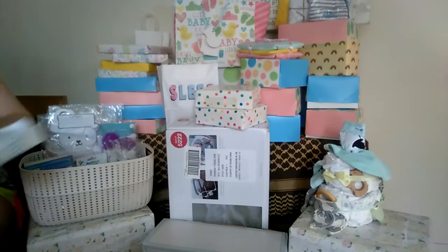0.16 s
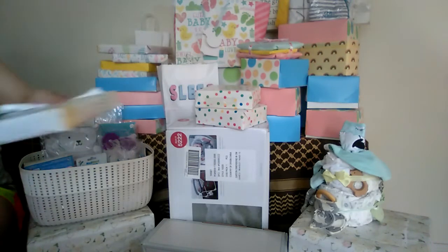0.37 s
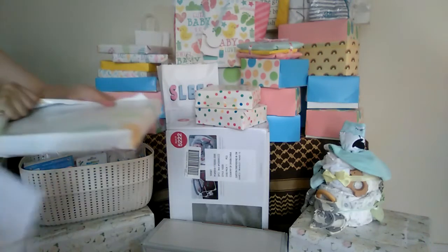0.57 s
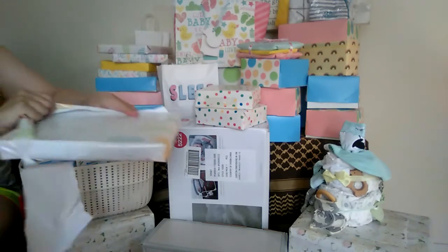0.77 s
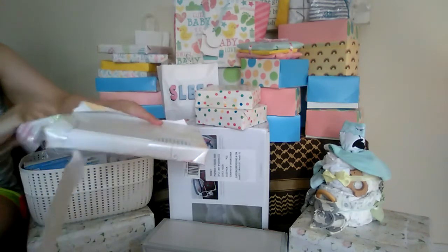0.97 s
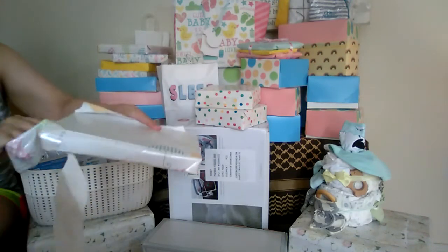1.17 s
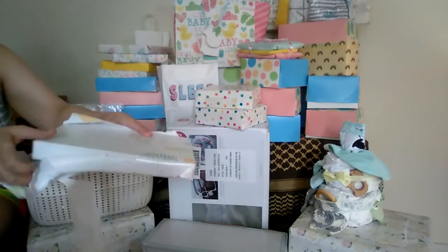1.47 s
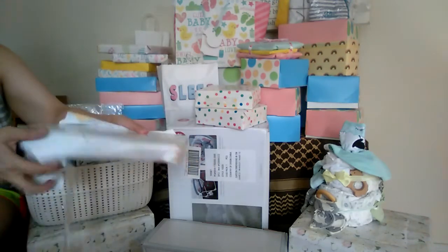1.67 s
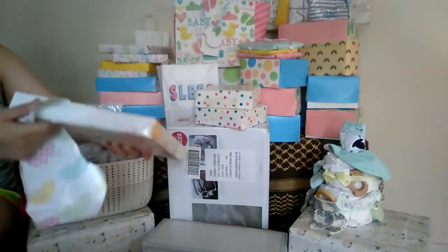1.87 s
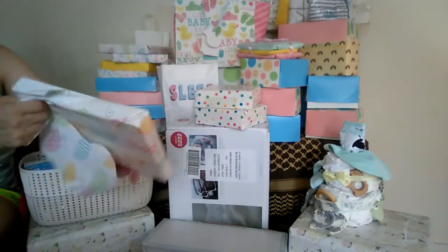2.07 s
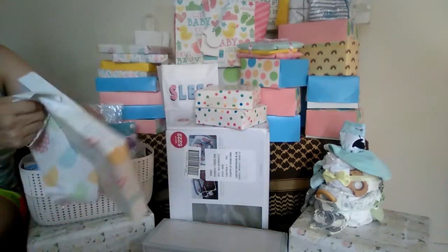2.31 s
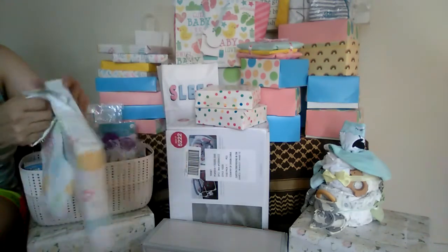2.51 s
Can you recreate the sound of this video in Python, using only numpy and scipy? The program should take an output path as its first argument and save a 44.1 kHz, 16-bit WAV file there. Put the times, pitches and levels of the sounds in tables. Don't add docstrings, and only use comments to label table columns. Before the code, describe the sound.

Glossy wrapping paper is torn and crinkled off a flat cardboard box in irregular spurts, with bright snaps, hollow lid knocks and short pauses, close to a small stereo microphone in a small room.

```python
import sys
import numpy as np
from scipy import signal
from scipy.fft import rfft, irfft
from scipy.io import wavfile
from scipy.ndimage import uniform_filter1d, minimum_filter1d

SR = 44100
rng = np.random.default_rng(int(sys.argv[2]) if len(sys.argv) > 2 else 0)


def volts_from_db(level):
    exponent = np.asarray(level, float) / 20
    return 10 ** exponent


def wav_record(signal):
    frames = np.transpose(np.atleast_2d(signal))
    bounded = np.clip(frames, -1, 1)
    quanta = np.round(bounded * 32767).astype(np.int16)
    wavfile.write(sys.argv[1], SR, quanta)


N = 116865


def evened(x):
    return x / np.sqrt(np.mean(x ** 2) + 1e-20)


def read(points, hz):
    f, value = np.transpose(points)
    return np.interp(np.log(hz + 1), np.log(f + 1), value)


def add(mix, start_s, sound):
    part = mix[..., round(start_s * SR):][..., :sound.shape[-1]]
    part += sound[..., :part.shape[-1]]


def colour(x, points, slope=1.):
    hz = abs(np.fft.fftfreq(4096, 1 / SR))
    log_gain = slope * np.log(volts_from_db(read(points, hz)))
    phase = -signal.hilbert(log_gain).imag
    taps = np.fft.ifft(np.exp(log_gain + 1j * phase)).real[:2048]
    if slope == 1:
        taps = taps / np.linalg.norm(taps)
    return signal.oaconvolve(x, taps)[:len(x)]


def resonate(x, hz, width_hz):
    turn = np.exp(2j * np.pi * np.cumsum(hz * np.ones(len(x))) / SR)
    r = np.exp(-np.pi * width_hz / SR)
    smooth = signal.lfilter([1 - r], [1, -r], x / turn)
    return 2 * (turn * smooth).real


# (pitch [Hz], level [dB per Hz])
AIR_SPECTRUM = [(15, -38.5), (25, -6.5), (249, -2), (335, -12), (503, 0.5), (2760, -11.5), (3340, -15.5),
                (11300, 1), (16000, -30)]


def air(busy):
    a, b, c = rng.standard_normal((3, N))
    hiss = np.array([colour(a, AIR_SPECTRUM), colour(0.46 * a + 0.6 * b, AIR_SPECTRUM)])
    rumble = [resonate(resonate(c + k * b, 66, 58), 66, 58) for k in (.17, -.17)]
    rumble = evened(np.array(rumble))
    busy_power = abs(uniform_filter1d(busy ** 2, size=2000))
    busy_db = np.clip(10 * np.log10(busy_power + 1e-9), -75, -52)
    return volts_from_db(-74.5) * hiss + volts_from_db(-75.5 + 0.4 * (busy_db + 50.0)) * rumble


def creases(low_hz, high_hz, cycles):
    creases_per_s, spread_db = 6000, 3.5
    size = volts_from_db(spread_db * np.minimum(rng.exponential(1, N), 5))
    size = size * (rng.random(N) < creases_per_s / SR) * rng.choice([-1., 1.], N)
    kind, out = rng.integers(0, 24, N), np.zeros(N)
    for k, hz in enumerate(np.geomspace(low_hz, high_hz, 24)):
        u = np.arange(400) / SR * hz
        grain = np.sin(2 * np.pi * u) * np.exp(-u / cycles)
        out += signal.oaconvolve(size * (kind == k), grain / np.linalg.norm(grain))[:N]
    spectrum = rfft(out)
    smooth_power = uniform_filter1d(abs(spectrum) ** 2, size=1500)
    return evened(irfft(spectrum / np.sqrt(smooth_power + 1e-9), N))


# (pitch [Hz], level [dB per Hz])
FILM_SPECTRUM = [(880, -57.5), (1500, -26.5), (3580, -20.5), (7000, -21), (10500, -7.5), (13900, -15.5),
                 (14600, -32), (16500, -34)]
# (pitch [Hz], level [dB per Hz])
BOX_SPECTRUM = [(60, -12), (200, -16), (330, -13.5), (540, -2), (1000, -5.5), (2500, -4), (5000, -6.5),
                (9000, -15.5)]
# (start [s], length [s], first level [dB], last level [dB], box share [dB])
PULLS = [(0, 0.036, -45.5, -56, -4), (0.063, 0.059, -51, -50, -0.5), (0.136, 0.013, -67, -58.5, 7.5),
         (0.164, 0.076, -48.5, -50.5, 4.5), (0.233, 0.006, -34, -33.5, -4.5), (0.244, 0.1, -37.5, -51.5, 1),
         (0.383, 0.017, -44.5, -82, 6.5), (0.428, 0.01, -57, -65, 5), (0.488, 0.0072, -60, -61, 6.5),
         (0.504, 0.011, -52, -56.5, 4.5), (0.545, 0.018, -61, -73.5, 7.5), (0.606, 0.035, -71.5, -72, 10),
         (0.656, 0.028, -54, -55, 6.5), (0.687, 0.13, -43, -49.5, 3), (0.836, 0.0075, -55, -64, -1),
         (0.887, 0.093, -48.5, -47, 2), (0.962, 0.039, -38.5, -34.5, -2), (1.008, 0.17, -30.5, -45.5, 2.5),
         (1.302, 0.055, -51, -45, 3.5), (1.345, 0.03, -41.5, -34.5, -1.5), (1.369, 0.058, -32, -35.5, -3),
         (1.423, 0.099, -34, -43.5, -17), (1.538, 0.045, -41.5, -49, -10), (1.592, 0.084, -52, -63.5, 9),
         (1.716, 0.013, -57.5, -63, 12.5), (1.746, 0.12, -42, -46, 0.5), (1.839, 0.23, -41.5, -49.5, 0),
         (2.033, 0.089, -39.5, -48.5, -1), (2.137, 0.074, -42.5, -47, 1.5), (2.213, 0.11, -46, -54.5, 6.5),
         (2.367, 0.077, -42, -53.5, 1), (2.623, 0.011, -68, -73, 4)]


def pulls():
    box_level_db, rise_s, release_db_per_s, clump_db = -7.5, 0.0014, 1300, 2
    t, film_power, box_power = np.arange(N) / SR, np.zeros(N), np.zeros(N)
    for start, length, first_db, last_db, box_db in PULLS:
        u = np.clip((t - start) / length, 0, 1)
        release_db = release_db_per_s * np.maximum(t - start - length, 0)
        level = volts_from_db(first_db + (last_db - first_db) * u - release_db)
        level = level * np.clip((t - start) / rise_s + (start == 0), 0, 1)
        film_power = film_power + level ** 2
        box_power = box_power + (level * volts_from_db(box_db + box_level_db)) ** 2
    slow_noise = uniform_filter1d(uniform_filter1d(rng.standard_normal(N), size=150), size=90)
    clumps = evened(volts_from_db(clump_db * evened(slow_noise)))
    film = np.sqrt(film_power) * colour(creases(2810, 15100, cycles=2.4), FILM_SPECTRUM)
    box = np.sqrt(box_power) * colour(creases(306.0, 9120, cycles=1.62), BOX_SPECTRUM)
    return clumps * (film + box)


# (time [s], peak level [dB], body share [dB])
SNAPS = [(0.0007, -20, -28), (0.0076, -34, -31), (0.0467, -39, -19), (0.0695, -33.5, -16.5),
         (0.0769, -29.5, -12), (0.1376, -33, -17), (0.1606, -33, -19), (0.1629, -30.5, -16),
         (0.1659, -34, -23.5), (0.1817, -39, -23), (0.1875, -35, -27.5), (0.2266, -34, -21),
         (0.2345, -22, -14), (0.2355, -10, -21), (0.2364, -13, -23.5), (0.2373, -17.5, -14),
         (0.2383, -5, -24.5), (0.2384, -11.5, -22.5), (0.2395, -23, -17), (0.2404, -10.5, -19.5),
         (0.2417, -10.5, -20.5), (0.2427, -19, -16.5), (0.2433, -17, -14), (0.2441, -21, -11),
         (0.245, -28, -17), (0.2543, -20, -16.5), (0.2624, -22, -22), (0.3168, -23, -22),
         (0.3826, -31.5, -14), (0.3935, -35, -16), (0.4032, -43, -14), (0.4328, -40, -13),
         (0.4346, -38.5, -11.5), (0.4941, -39, -15), (0.508, -39.5, -14.5), (0.51, -30, -6.5),
         (0.6127, -44.5, -18), (0.6595, -30.5, -19), (0.6798, -22.5, -25), (0.6841, -32, -19),
         (0.688, -17.5, -17), (0.745, -25, -23), (0.7468, -28, -8), (0.8435, -45, -18.5),
         (0.8477, -40, -25), (0.8895, -32, -14.5), (0.9149, -36, -26), (0.9268, -38, -14.5),
         (0.9555, -22, -16.5), (0.9574, -15.5, -13.5), (0.9594, -18, -12), (0.9806, -13.5, -28.5),
         (0.9828, -23, -16.5), (1.0148, -22, -15), (1.019, -26, -21), (1.021, -19, -15.5),
         (1.0229, -19.5, -15.5), (1.055, -23, -20), (1.0846, -18.5, -25),
         (1.311, -33.5, -12), (1.3738, -17, -28), (1.46, -22.5, -33), (1.481, -28, -26),
              (1.4854, -28, -25), (1.5137, -32, -30), (1.597, -30, -10), (1.7473, -22.5, -16),
              (1.791, -20, -3.5), (1.8181, -27, -25), (1.8482, -24, -19), (1.858, -18, -20),
              (1.8628, -22, -15), (1.9058, -27, -19), (1.979, -32, -20), (2.0348, -27, -17),
              (2.038, -12, -23), (2.0397, -31.5, -14), (2.0608, -25, -14), (2.1345, -19.5, -2.5),
              (2.1376, -20.5, -19), (2.2183, -18.5, -16), (2.221, -30, -22), (2.2267, -31.5, -12),
              (2.2917, -30, -22), (2.2981, -26, -30), (2.3518, -31.5, -26), (2.3532, -36, -23),
              (2.3656, -15.5, -37), (2.366, -21.5, -15), (2.3695, -40, -28), (2.3859, -29, -23),
              (2.6292, -48.5, -13)]


def snaps():
    out, t, rows = np.zeros(N), np.arange(400) / SR, SNAPS
    noises = rng.standard_normal((len(rows), 400))
    for (start, db, body_db), noise in zip(rows, noises):
        burst = noise * np.exp(-.5 * ((t - .001) / .00033) ** 2)
        top = colour(burst, FILM_SPECTRUM)
        body = resonate(burst, 4300 * volts_from_db(1.4 * noise[0]), 2600)
        tick = top / abs(top).max() + volts_from_db(body_db - 3.0) * body / abs(body).max()
        add(out, start - .0012, volts_from_db(db - 0.32) * tick)
    return out


# (time [s], peak level [dB], pitch [Hz])
KNOCKS = [(0.176, -40.5, 800), (0.215, -40, 1700), (0.235, -26, 573), (0.244, -33, 830), (0.35, -43, 510),
          (0.383, -45, 1070), (0.434, -48, 910), (0.506, -45.5, 750.0), (0.514, -50, 766),
          (0.546, -45.5, 613), (0.613, -51, 644), (0.66, -46.5, 494), (0.746, -42.5, 485),
          (0.927, -44, 900.0), (0.957, -24.5, 507), (0.965, -45, 584), (0.973, -35, 520.0),
          (1.019, -27, 517), (1.028, -32.5, 1090), (1.307, -49, 1660.0), (1.348, -40.5, 790.0),
          (1.356, -30.5, 1790), (1.373, -37.5, 906), (1.38, -35, 1530), (1.597, -38.5, 1980),
          (1.627, -31, 1660), (1.661, -47.5, 446), (1.722, -47, 1670), (1.764, -29.5, 1720),
          (1.992, -39, 1200), (2.133, -53, 1460), (2.163, -35.5, 2000), (2.233, -29, 968),
          (2.284, -34.5, 547), (2.366, -40.5, 534), (2.63, -61, 500.0)]


def knocks():
    out, t = np.zeros(N), np.arange(3000) / SR
    noises = rng.standard_normal((len(KNOCKS), 3000))
    for (start, db, hz), noise in zip(KNOCKS, noises):
        blow = (0.69 + uniform_filter1d(noise, size=12) * 3) * np.exp(-t / 0.00066)
        ring = resonate(blow, hz, 0.25 * hz)
        ring = ring + volts_from_db(-8.0) * resonate(blow, 1.6 * hz, 0.21 * hz)
        if hz < 700:
            ring = ring + volts_from_db(-20) * resonate(blow, 220, 67)
        add(out, start - .0012, volts_from_db(db + 0.2) * ring / abs(ring).max())
    return out


# (start [s], length [s], first pitch [Hz], last pitch [Hz], level [dB])
SQUEAKS = [
    (1.364, 0.029, 9700, 10260, -34.5),
    (1.446, 0.076, 10070, 10460, -34),
    (1.51, 0.028, 10590, 10480, -35.5),
    (1.566, 0.086, 367, 423, -61),
    (1.75, 0.13, 189, 160, -66),
]


def squeaks():
    out = np.zeros(N)
    for start, length, first_hz, last_hz, db in SQUEAKS:
        u = np.arange(0, length, 1 / SR) / length
        hz = first_hz + (last_hz - first_hz) * u
        whistle = evened(resonate(rng.standard_normal(len(u)), hz, 71))
        add(out, start, volts_from_db(db) * np.sqrt(np.sin(np.pi * u)) * whistle)
    return out


def room(x):
    t60_s, level_db, wide_hz = 0.12, 1, 509
    taps = np.zeros((3, 2, 9000))
    at = np.arange(60, 8980, 20) + rng.integers(0, 20, (3, 2, 446))
    np.put_along_axis(taps, at, rng.choice([-1., 1.], at.shape), 2)
    taps = taps * volts_from_db(-60 * np.arange(9000) / SR / t60_s)
    bass = signal.filtfilt(*signal.butter(1, wide_hz, fs=SR), taps[:, 0] - taps[:, 1])
    taps = np.stack([taps[:, 0], taps[:, 1] + bass], axis=1) / np.linalg.norm(taps[0, 0])
    turn = 2 * np.pi * (np.arange(N) / SR * 5 + np.arange(3)[:, None] / 3)
    fed = x * np.sqrt(2 / 3) * np.cos(turn)
    return volts_from_db(level_db) * signal.fftconvolve(fed[:, None], taps, axes=2).sum(0)[:, :N]


# (time [s], delay of right port [samples], left-right level [dB])
PLACE = [
    (0, 12, 3),
    (.5, 10, 1),
    (.8, 8, 0),
    (1.2, 7, 0),
    (2.65, 7, 0),
]


def place(near, wet):
    s, lag, pan_db = np.transpose(PLACE)
    n = np.arange(N)
    delay = np.round(np.interp(n / SR, s, lag)).astype(int)
    late = near[np.maximum(n - delay, 0)]
    side = volts_from_db(np.interp(n / SR, s, pan_db) / 2)
    return (np.array([near, late]) + wet) * [side, 1 / side]


def scene():
    ticks = snaps()
    near = pulls() + knocks() + squeaks()
    near = signal.lfilter(*signal.butter(2, 140.5, "high", fs=SR), near)
    wet = room(near + volts_from_db(-4.5) * ticks)
    near = near + ticks
    return place(near, wet) + air(near)


# (pitch [Hz], left-right level [dB])
PORT_BALANCE = [(100, -0.5), (2000, 0.5), (4000, 0), (8000, -4), (11000, 3), (14000, 6)]


def ports(dry):
    left = colour(dry[0], PORT_BALANCE, slope=0.46)
    right = colour(dry[1], PORT_BALANCE, slope=-0.496)
    return np.array([left, right])


def thin_out(x):
    edge_hz, attack_db, hole_db = 14250, 11, -2.5
    hz, _, z = signal.stft(x, SR, nperseg=256)
    power = (abs(z) ** 2).sum((0, 1)) + 1e-14
    attack = power > volts_from_db(2 * attack_db) * minimum_filter1d(power, size=4, origin=1)
    attack &= power > volts_from_db(8) * minimum_filter1d(power, size=4, origin=-2)
    kept = np.maximum(hz[:, None] < edge_hz, attack)
    x = signal.istft(z * kept, SR, nperseg=256)[1][:, :N]

    hz, _, z = signal.stft(x, SR, nperseg=1024)
    power = uniform_filter1d((abs(z) ** 2).sum(0)[:512], size=3, axis=1)
    band = np.repeat(power.reshape(64, 8, -1).mean(1), 8, axis=0)
    weak = band < volts_from_db(hole_db) ** 2 * uniform_filter1d(band, size=64, axis=0)
    weak = weak * ((hz[:512] > 2400) & (hz[:512] < 7800))[:, None]
    kept = np.pad(1 - weak, ((0, 1), (0, 0)))
    return signal.istft(z * kept, SR, nperseg=1024)[1][:, :N]


def top_cut(x):
    return signal.sosfilt(signal.butter(12, 16460, fs=SR, output="sos"), x)


def record(dry):
    ceiling = .62
    limited = ceiling * np.tanh(ports(dry) / ceiling)
    mix = thin_out(limited)
    return top_cut(mix)


dry = scene()
out = record(dry)
wav_record(out)
```